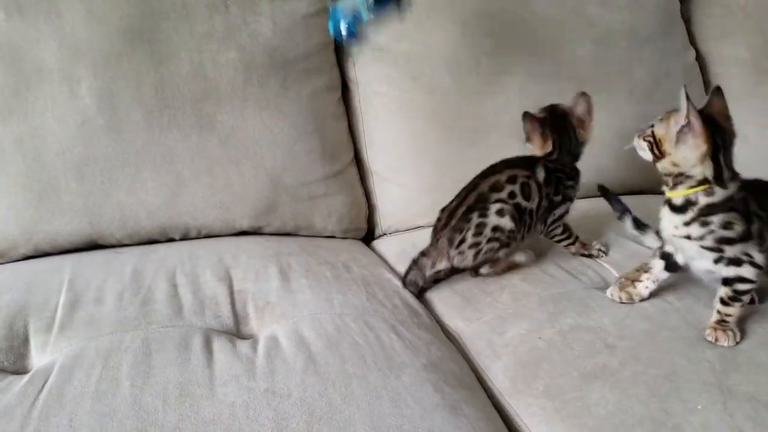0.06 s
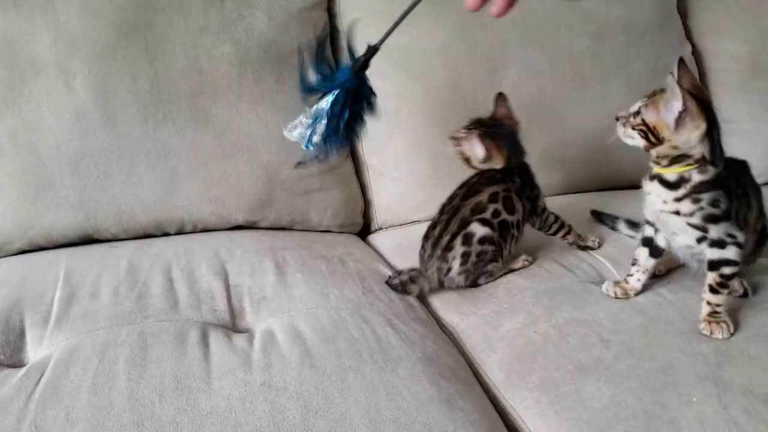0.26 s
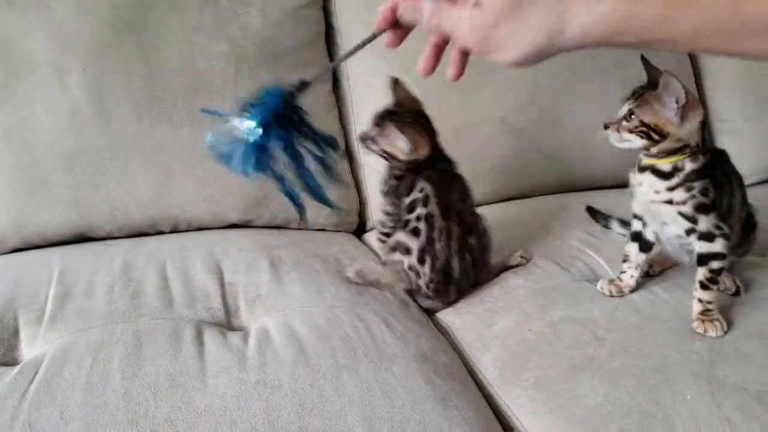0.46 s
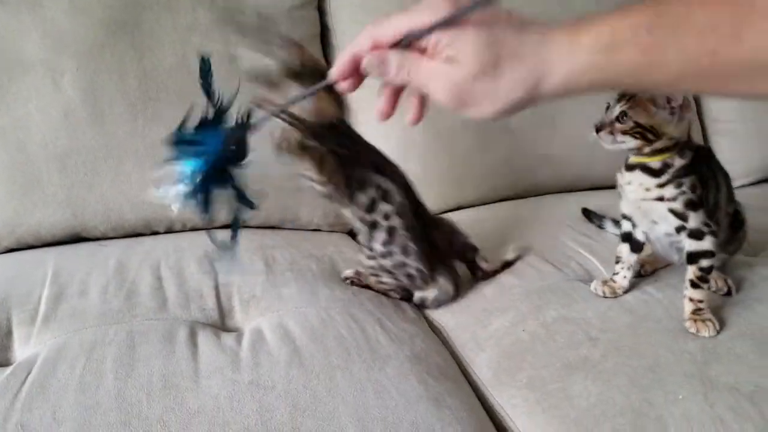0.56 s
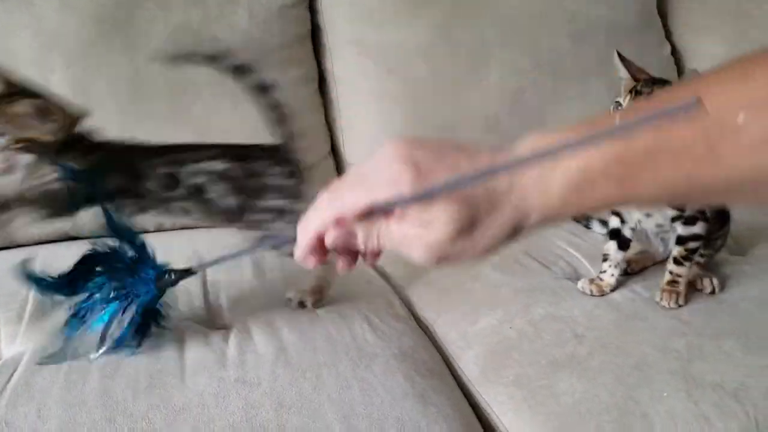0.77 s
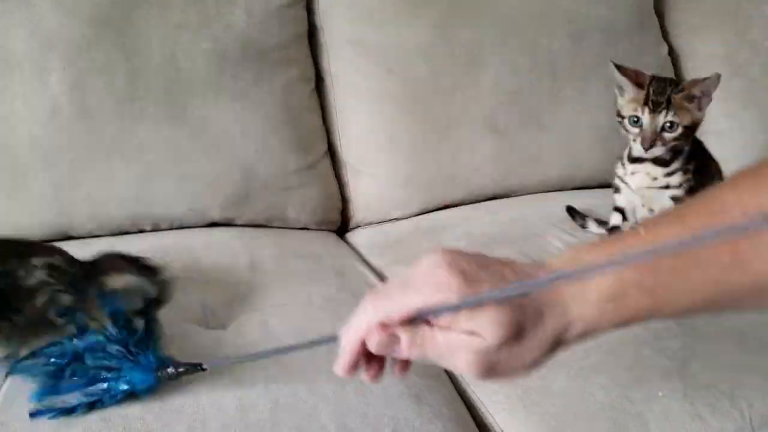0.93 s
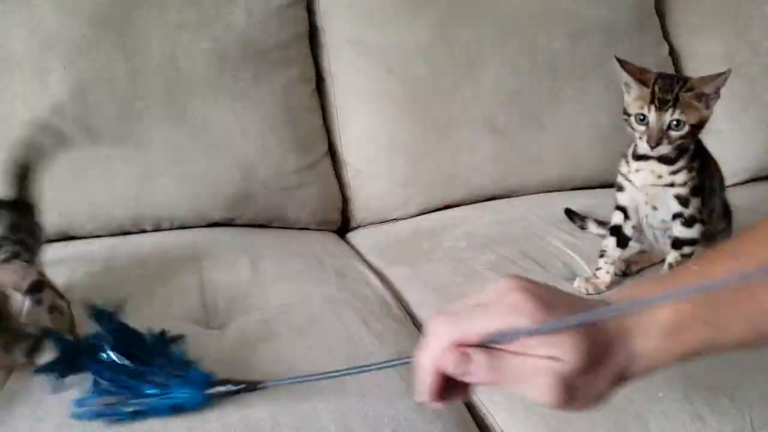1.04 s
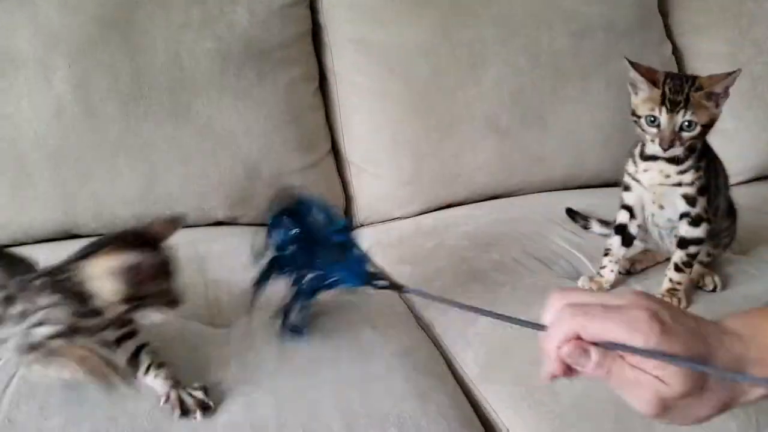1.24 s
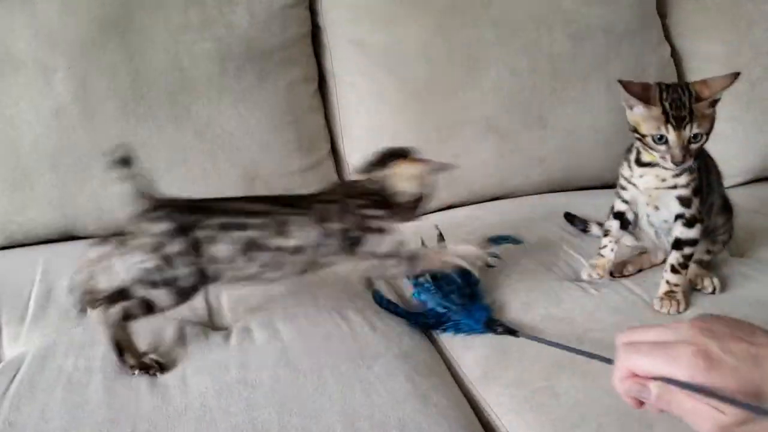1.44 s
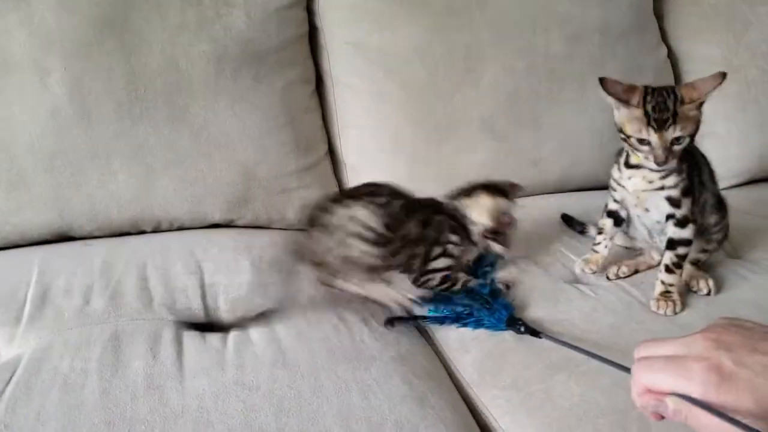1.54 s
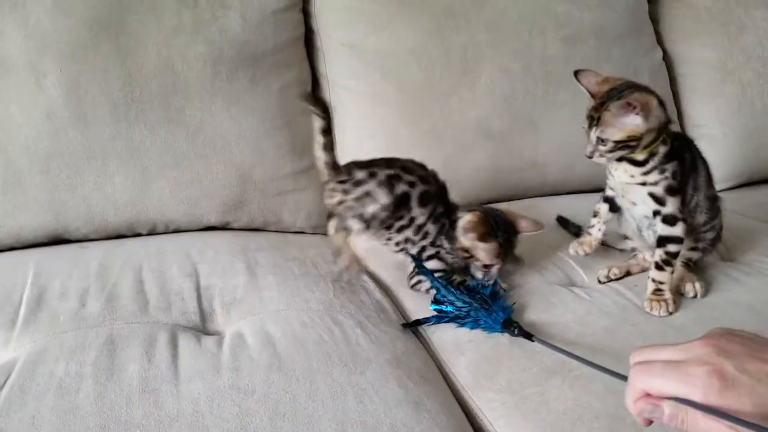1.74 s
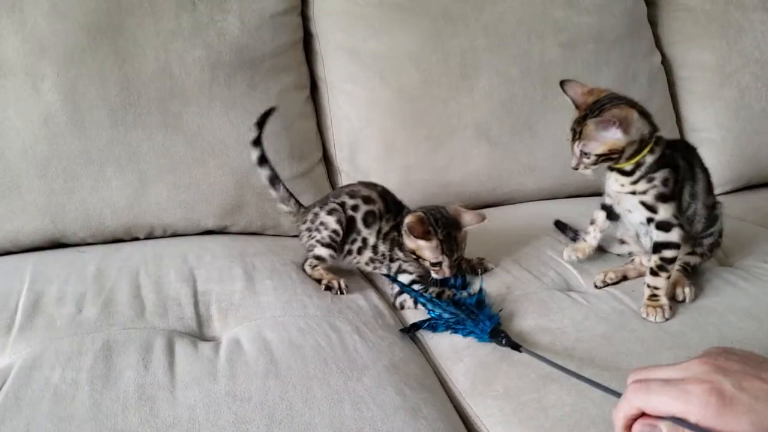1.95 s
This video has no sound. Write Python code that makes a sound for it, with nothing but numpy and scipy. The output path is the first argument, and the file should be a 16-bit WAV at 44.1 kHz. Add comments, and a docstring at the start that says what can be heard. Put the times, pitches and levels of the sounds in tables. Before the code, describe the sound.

Crinkly rustling comes in uneven bursts as a cat toy is flicked near the microphone. Soon kittens pounce after it, adding soft thumps, claw ticks and scuffing on a couch in a quiet room.

```python
"""Crinkling, soft thuds and little ticks, close by in a quiet room: kittens chase a wand toy over a couch.
Each flick of the wand crinkles its tuft of foil strips and flutters its feathers.
Paws slap the fabric and set the cushion thudding, claws and the stick tick,
and fur and feet scuff over the upholstery."""
import sys
import numpy as np
from scipy import signal
from scipy.fft import rfft, irfft
from scipy.io import wavfile

SR = 44100
rng = np.random.default_rng(int(sys.argv[2]) if len(sys.argv) > 2 else 0)


def to_wav(s):
    """Save 16-bit WAV."""
    ch = np.atleast_2d(s).T  # columns
    pcm = np.round(np.clip(ch, -1, 1) * 32767)  # PCM
    wavfile.write(sys.argv[1], SR, pcm.astype(np.int16))


N = 88200
T = np.arange(N) / SR
HZ = np.maximum(np.fft.rfftfreq(N, 1 / SR), 1)

# tone of crinkling strips, grit and plucked threads: f/Hz, relative level/dB
CRINKLE_TONE = [(300, -20), (800, -7), (1300, -4), (2300, 3), (3200, -1), (4700, -2), (6000, -16),
                (7600, -20.5), (9000, -29), (16000, -36)]


def toy():
    """Every flick crinkles the strips, flutters the feathers and makes the foil sizzle."""
    # flicks of the wand: t/s, rise/s, decay/s, crinkle/dB, flutter/dB, sizzle/dB
    flicks = [(0., 0.015, 0.18, -53.5, -75, -63.5), (0.055, 0.0066, 0.054, -39, -80, -87),
              (.12, 0.064, 0.17, -49, -74, -51), (0.223, 0.012, 0.04, -23.5, -30.5, -34),
              (0.246, 0.018, 0.094, -32, -30.5, -36), (.375, 0.11, 0.13, -45, -52.5, -41.5),
              (0.472, 0.017, 0.064, -30.5, -37, -38.5), (0.543, 0.0093, 0.045, -37, -39.5, -42.5),
              (0.598, 0.014, 0.035, -35, -42.5, -42), (0.688, 0.018, 0.035, -40.5, -51.5, -29),
              (0.774, 0.014, 0.03, -47, -68, -36), (0.809, 0.015, 0.036, -44.5, -46.5, -41),
              (0.869, 0.011, 0.54, -49.5, -48, -46.5), (0.954, 0.016, 0.043, -33, -35, -40),
              (0.986, 0.018, 0.038, -35, -65, -42), (1.024, 0.012, 0.036, -37.5, -37, -42),
              (1.105, 0.0093, 0.059, -44.5, -47, -47), (1.175, 0.0032, 0.0046, -36.5, -31, -34.5),
              (1.189, 0.0074, 0.029, -33.5, -37, -43.5), (1.221, 0.0045, 0.044, -62, -56, -47),
              (1.3, 0.021, 0.071, -46.5, -45.5, -47), (1.36, 0.0068, 0.03, -46, -63, -43.5),
              (1.406, 0.0091, 0.024, -47, -52, -43), (1.425, 0.0077, 0.077, -46.5, -52, -55),
              (1.553, 0.0061, 0.014, -45, -37, -42.5), (1.645, 0.012, 0.037, -50, -41.5, -52.5)]
    # tones of the feathers and the foil: f/Hz, relative level/dB
    flutter_tone = [(50, -29), (95, 3), (200, -1), (310, -4.5), (430, 1.5), (550, -3.5), (680, -1.5),
                    (1000, -6.5), (1800, -19.5), (5000, -36.5)]
    sizzle_tone = [(1500, -75), (3400, -2), (4400, 9.5), (5800, 1.5), (7400, 9), (8800, -2), (10000, -0.5),
                   (11500, 6.5), (13500, -0.5), (16000, -2.5)]
    # where the tuft swings: t/s, left minus right/dB
    swing = [(.63, -1.4), (.705, 1), (1.2, -1)]
    power = sum(np.outer(undb(dbs), swell(t, rise, decay)) ** 2 for t, rise, decay, *dbs in flicks)
    crinkle, flutter, sizzle = np.sqrt(power)
    strips = colour(crinkle * crackle(per_second=3000, spread_db=1, smooth=0.65), CRINKLE_TONE)
    strips += colour(sizzle * crackle(per_second=1500, spread_db=5.5, smooth=1.18), sizzle_tone)
    feathers = colour(flutter * crackle(per_second=1200, spread_db=3, smooth=0.96), flutter_tone)
    return (clumps(strips) + feathers) * pan(np.interp(T, *np.array(swing).T))


def clumps(strips, band_hz=824, step_s=0.009, flicker_db=2):
    """Strips touch in quick uneven bunches, each at its own pitch, so every band flickers on its own."""
    spectrum, out = rfft(strips), 0
    for hz in np.arange(0, SR / 2, band_hz):
        band = irfft(spectrum * np.maximum(1 - abs(HZ - hz) / band_hz, 0), N)
        wander = np.interp(T, np.arange(N) * step_s, rng.standard_normal(N))
        gain = undb(flicker_db * np.clip(wander, -2, 2))
        out = out + band * gain / np.sqrt(np.mean(gain ** 2))
    return out


def foil_snaps():
    """Now and then one strip buckles with a crisp, thin click."""
    # single strips snapping: t/s, relative level/dB
    snaps = [(.402, -32), (.822, -15.5), (1.1842, -17.5), (1.232, -21), (1.526, -31), (1.656, -33),
             (1.684, -28), (1.911, -46), (1.935, -31)]
    loudness = sum(undb(db) * swell(t, rise=0.0001, decay=0.00047) for t, db in snaps)
    bursts = loudness * rng.standard_normal((2, N))
    return signal.lfilter(*signal.butter(1, 2760, "high", fs=SR), bursts) / 2


def paws(cushion_rise_s=0.0026, usual_hz=109):
    """Each paw slaps the fabric, makes the cover shiver and gives the cushion a short bounce."""
    # paw landings: t/s, slap/dB, contact/ms, cushion/dB, cushion pitch/Hz
    landings = [(0.0439, -42.5, 1.0, -54, 230), (0.7274, -20, 0.33, -25, 110),
                (0.8425, -23, 0.26, -56, 131), (0.9419, -18.5, 0.42, -20.5, 121),
                (1.1111, -28, 0.27, -41, 118), (1.1339, -22, 0.4, -25, 100.5),
                (1.1846, -22.5, 0.48, -26, 255), (1.186, -38, 0.5, -27, 452),
                (1.2558, -27.5, 0.67, -29.5, 93), (1.2583, -25.5, 0.73, -20.5, 277),
                (1.2665, -38, 2.5, -33, 109), (1.3152, -31.5, 0.8, -29.5, 233),
                (1.3203, -30, 0.52, -46, 109), (1.4383, -27.5, 0.54, -51, 274),
                (1.4519, -23, 0.39, -29.5, 86), (1.526, -29, 0.25, -44, 147), (1.579, -44, 1.9, -35.5, 118),
                (1.6236, -30.5, 0.74, -36, 85), (1.6521, -29, 0.26, -38, 140), (1.658, -32, 0.15, -36, 137),
                (1.7008, -31, 0.47, -37.5, 143), (1.845, -41.5, 0.94, -46, 90)]
    shiver = signal.lfilter(*signal.butter(2, [303, 910], "band", fs=SR), rng.standard_normal(N))
    shiver *= undb(-12.5) / shiver.std()
    out = 0
    for t, slap_db, contact_ms, cushion_db, hz in landings:
        cover = slap(t, contact_ms, rebound=1.17) + shiver * swell(t, rise=0.0011, decay=0.0059)
        give = 1 - np.exp(-np.maximum(T - t, 0) / cushion_rise_s)
        bounce = ring(t, hz, fade_s=0.083 * np.sqrt(usual_hz / hz))  # higher bounces die sooner
        out = out + undb(slap_db) * cover + undb(cushion_db) * give * bounce
    return out * pan(db=2)


def ticks(lag_s=0.00025):
    """Claws and the stick make hard little hits, each a snap, a brief knock and a spray of grit."""
    # hits: t/s, snap/dB, contact/ms, grit/dB, knock/dB, knock pitch/Hz
    hits = [(0.2331, -29.5, 0.16, -19.5, -17.5, 1940), (0.9898, -24, 0.15, -25, -26, 2570),
            (1.034, -27, 0.2, -35.5, -31, 2660), (1.1836, -18.5, 0.086, -23, -26, 1150),
            (1.2623, -22, 0.25, -30, -61, 880), (1.3656, -29, 0.2, -29, -31, 2420),
            (1.41, -32.5, 0.3, -33.5, -38.5, 3180), (1.4665, -21, 0.13, -26, -47, 1220),
            (1.4736, -38, 0.13, -36, -44, 1680), (1.56, -26, 0.1, -32, -27.5, 1480),
            (1.6919, -29.5, 0.27, -31.5, -44, 1490)]
    ear_delays = np.array([[-lag_s / 2], [lag_s / 2]])  # the snap reaches the left side first
    snaps = knocks = grit = 0
    for t, snap_db, contact_ms, grit_db, knock_db, hz in hits:
        snaps -= undb(snap_db) * slap(t + ear_delays, contact_ms)
        knocks += undb(knock_db) * ring(t, hz, fade_s=0.012)
        grit += undb(grit_db) * swell(t, rise=0.0014, decay=0.00043)
    return (snaps + knocks) * pan(db=2) + colour(grit * rng.standard_normal((2, N)), CRINKLE_TONE)


def scuffs():
    """The weave catches and slips under sliding fur and feet, while claws pluck single threads."""
    # slides over the couch: t/s, rise/s, fade/s, level/dB
    slides = [(0., 0.0075, 0.15, -54.5), (0.191, 0.032, 0.14, -46), (.51, 0.019, 0.24, -44.5),
              (.73, 0.013, 0.066, -41.5), (0.849, 0.035, 0.15, -38.5), (1.09, 0.017, 0.12, -40.5),
              (1.253, 0.003, 0.12, -42.5), (1.42, 0.037, 0.16, -44), (1.55, 0.013, 0.12, -42),
              (1.64, 0.045, 0.076, -45)]
    # tone of rubbed fabric: f/Hz, relative level/dB
    fabric_tone = [(25, -48), (42, -10), (70, 3.5), (130, 1.5), (200, -2), (400, -9.5), (750, -7.5),
                   (1400, -17), (4000, -22), (16000, -46)]
    power = 0
    for t, rise, fade, db in slides:
        starting = np.clip((T - t) / rise, 0, 1)
        stopping = np.exp(-(np.maximum(T - t - rise, 0) / fade) ** 2)
        power += (undb(db) * starting * stopping) ** 2
    force = np.sqrt(power)
    weave = colour(force * crackle(per_second=700, spread_db=4, smooth=0.72), fabric_tone)
    threads = colour(force * crackle(per_second=150, spread_db=3, smooth=0), CRINKLE_TONE)
    return weave + undb(-14) * threads


def stick_shudder(start=0.215, hz=100):
    """The wand bends to and fro with the first hard flick, giving a brief low hum."""
    return undb(-35) * swell(start, rise=0.035, decay=0.082) * np.sin(2 * np.pi * hz * (T - start))


def room_echo(sound, fade_s=0.31):
    """The furnished room returns a short echo, dull and thin in the bass."""
    tail = signal.lfilter(*signal.butter(1, [250, 5000], "band", fs=SR), rng.standard_normal((2, N)))
    tail *= swell(0.0018, rise=0.01, decay=fade_s / np.log(1000))
    tail /= np.sqrt(np.sum(tail ** 2, axis=1, keepdims=True))
    return undb(-17) * signal.fftconvolve(sound, tail, axes=1)[:, :N]


def room_hush():
    """The faint, steady noise of the quiet room."""
    # tone of the hush: f/Hz, relative level/dB
    hush_tone = [(25, 2.5), (170, 5.5), (500, -2.5), (1200, -2), (3000, -9.5), (4700, -5), (6500, -17),
                 (9000, -25), (16000, -34)]
    return undb(-58) * colour(rng.standard_normal((2, N)), hush_tone)


def undb(db):
    """Turn decibels into a gain to multiply by."""
    return 10 ** (np.asarray(db) / 20)


def over_hz(table, column=1):
    """Join the points of one table column into a curve over all pitches."""
    points = np.array(table, float)
    return np.interp(np.log(HZ), np.log(points[:, 0]), points[:, column])


def pan(db):
    """Left and right gains, with the left louder by db."""
    return undb(np.array([[1], [-1]]) * db / 2)


def swell(start, rise, decay):
    """A straight rise, then a fade that falls fast at first; times in seconds."""
    age = T - start
    return np.clip(age / rise, 0, 1) * np.exp(-np.maximum(age - rise, 0) / decay)


def ring(start, hz, fade_s):
    """One struck note that drops 60 dB in fade_s."""
    age = np.maximum(T - start, 0)
    return np.sin(2 * np.pi * hz * age) * np.exp(-np.log(1000) * age / fade_s)


def slap(t, contact_ms, rebound=1):
    """A brief contact pulls the air, then pushes it; the push is rebound times longer and weaker."""
    progress = (T - t) / (contact_ms / 1000)
    stretch = np.where(progress > 0, rebound, 1)
    progress = progress / stretch
    return progress * np.exp((1 - progress ** 2) / 2) / stretch


def crackle(per_second, spread_db, smooth):
    """Two streams of tiny snaps of uneven size; smooth adds an even rubbing noise."""
    happens = rng.random(N) < per_second / SR
    sizes = undb(spread_db * np.minimum(rng.exponential(size=N), 3))
    snaps = happens * sizes * rng.choice([-1., 1.], (2, N))
    return (snaps / snaps.std() + smooth * rng.standard_normal((2, N))) / np.hypot(1, smooth)


def colour(pair, tone):
    """Give two noise streams a tone and spread them between left and right."""
    # how the two microphones hear rustle: f/Hz, left minus right/dB, likeness (1 = the same)
    stereo = [(298, 1.2, 0.99), (750, 2, 0.82), (1500, -3, 0), (3310, -2, -.15), (5590, -10.5, 0.14),
              (6850, 1, 0), (13500, 4, 0.03)]
    gain = undb(over_hz(tone))
    cepstrum = irfft(np.log(gain / np.sqrt(np.mean(gain ** 2))), N)
    # fold the filter so that it rings after each snap, never before
    cepstrum[1:N // 2] *= 2
    cepstrum[N // 2 + 1:] = 0
    first, second = rfft(pair) * np.exp(rfft(cepstrum))
    likeness = np.clip(over_hz(stereo, column=2), -1, 1)
    mid = first * np.sqrt((1 + likeness) / 2)
    side = second * np.sqrt((1 - likeness) / 2)
    lean = undb(over_hz(stereo) / 2)
    return irfft(np.array([(mid + side) * lean, (mid - side) / lean]), N)


def scene():
    """Toy and kittens, with their echo, over the hush of the room."""
    play = toy() + foil_snaps() + stick_shudder() + paws() + ticks() + scuffs()
    return play + room_echo(play) + room_hush()


def record(dry):
    """The recorder cuts the treble above 15800 Hz."""
    return signal.sosfilt(signal.ellip(10, .1, 80, 15800, fs=SR, output="sos"), dry)


dry = scene()
out = record(dry)
to_wav(out)
```